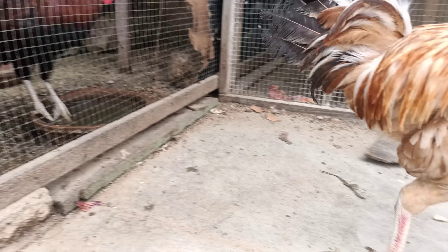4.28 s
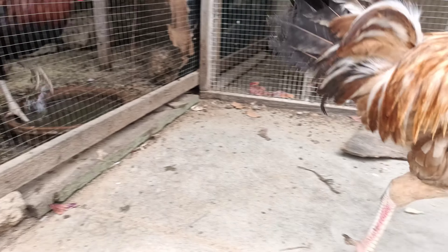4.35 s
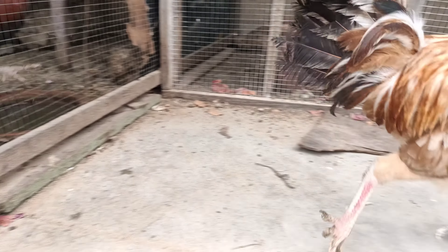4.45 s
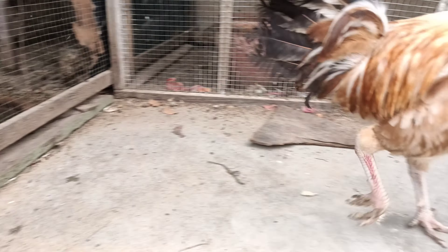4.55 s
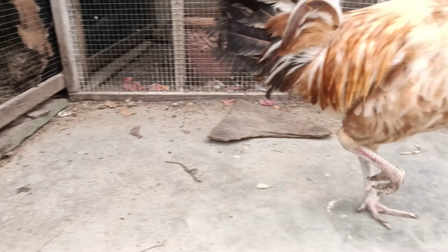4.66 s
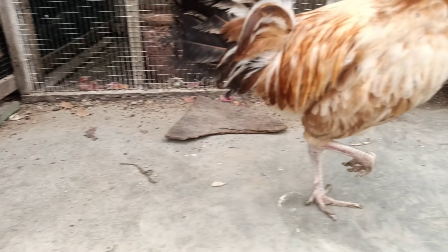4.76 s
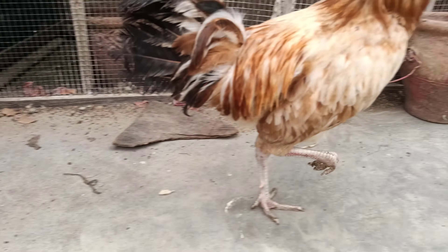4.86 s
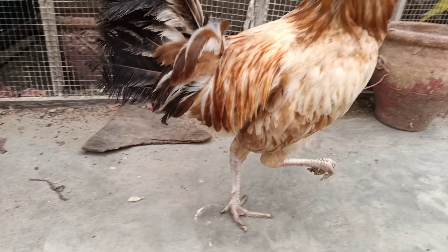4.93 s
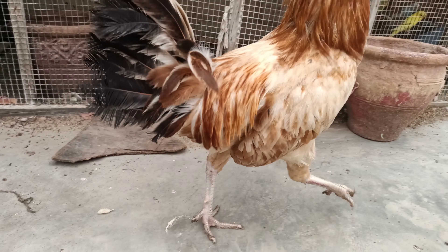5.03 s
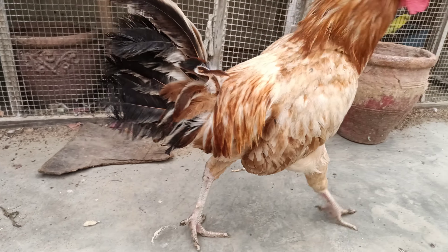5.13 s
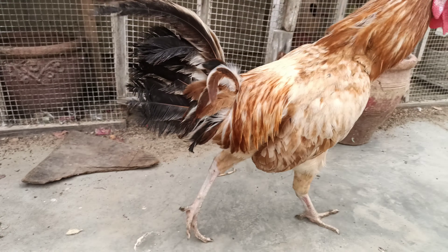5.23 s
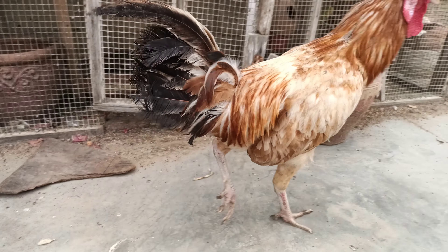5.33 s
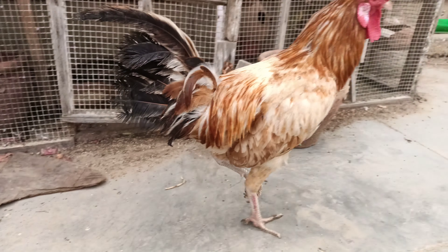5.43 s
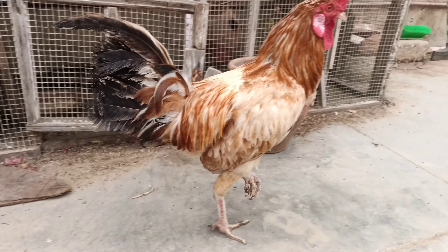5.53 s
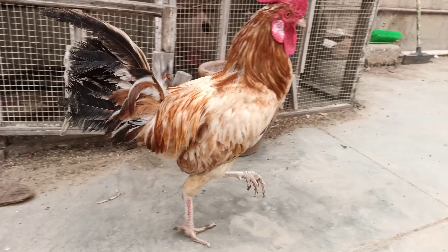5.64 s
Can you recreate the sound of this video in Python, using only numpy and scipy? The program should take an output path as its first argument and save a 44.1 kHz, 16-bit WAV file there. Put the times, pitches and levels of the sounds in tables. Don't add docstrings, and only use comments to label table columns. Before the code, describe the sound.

Hand-held stereo microphone in a concrete yard. A rooster purrs faintly close by amid light beak and claw ticks, then heavy low wind buffets mainly the right side for about two seconds. Small birds in pens to the right squeak in falling whistles with a short wall echo. As the wind weakens, the rooster gives three loud throaty clucks, then a looser run and a soft last one.

```python
import sys
import numpy as np
from scipy import signal
from scipy.fft import rfft, irfft, next_fast_len
from scipy.io import wavfile
from scipy.ndimage import uniform_filter1d, minimum_filter1d

SR = 44100
rng = np.random.default_rng(int(sys.argv[2]) if len(sys.argv) > 2 else 0)


def gain_from_decibels(decibels):
    exponent = np.asarray(decibels, float) / 20
    return 10 ** exponent


def to_wav(s):
    ch = np.atleast_2d(s).T
    pcm = np.round(np.clip(ch, -1, 1) * 32767)
    wavfile.write(sys.argv[1], SR, pcm.astype(np.int16))


N = 250929

# (time [s], level [dB], left minus right [dB])
WIND_LEVEL = [(0.0, -18, -11.5), (0.11, -40, -5), (0.3, -29.5, 7), (0.65, -18.5, -35), (1.54, -19.5, -34),
              (1.68, -36, -4), (1.9, -22, -50), (2.36, -42, 1), (2.69, -27, -50), (2.82, -36, -20),
              (3.55, -29.5, -42), (3.63, -42, -6), (4.17, -34, -35), (4.61, -47.5, 10), (4.71, -37, -15),
              (4.93, -59, -4), (5.12, -32.5, -34), (5.69, -48.5, 0)]
# (time [s], length [s], pitch [Hz], level [dB])
YOUNG_SQUAWKS = [
    (0.116, 0.021, 1130, -50),
    (0.344, 0.016, 1025, -44.5),
    (0.463, 0.029, 1056, -41),
    (0.689, 0.025, 1033, -47),
]


def rooster():
    # (time [s], peak [dB], pitch [Hz], roughness [0-1], lift of the upper throat [dB])
    clucks = [
        (3.584, -11, 333.1, 0.63, 5),
        (3.687, -14.5, 320.4, 0.28, -1),
        (3.865, -12, 313, 0.19, -2),
        (4.42, -34, 263, 0.54, -3),
        (4.509, -37.5, 253, 0.08, -7),
        (4.606, -17.5, 291.4, 0.51, -2),
        (4.733, -21, 272, 0.32, -13),
        (4.881, -16, 283.7, 0.4, 0),
        (5.031, -17, 290.3, 0.55, 10),
        (5.457, -31.5, 253, 0.25, -9),
    ]
    voice = purr()
    for s, db, hz, rough, lift_db in clucks:
        length = 0.0341 + .0004 * db
        beak = 0.84 + 0.43 * rough
        add(voice, s, cluck(db, hz, length, beak, rough, lift_db))
    return voice


def cluck(db, hz, length, beak, rough, lift_db):
    # (frequency [Hz], width [Hz], level [dB])
    throat = [(366, 236, 6.5), (470, 259, 6), (910, 188, 4), (1380, 300, -16), (1720, 400, -15),
              (2600, 480, -12), (4000, 4000, -25)]
    t = np.arange(round((length + 0.28) * SR)) / SR
    bend = 0.0392 * np.sin(np.pi * t / length)
    jitter = 0.26 * rough * wander(len(t), 0.0026)
    turns = np.cumsum(hz * (1 + bend + jitter)) / SR
    pulses = sum(np.cos(2 * np.pi * k * turns) for k in range(1, 20))
    puffs = np.exp(-(turns % 1) / 0.61) * rng.standard_normal(len(t))
    swell = np.sin(np.pi * np.clip(t / length, 0, 1) ** 1.9) ** 0.55
    drive = ((1 - rough) * evened(pulses) + rough * evened(puffs)) * swell
    voice = np.zeros(len(t))
    for k, (f, width, gain_db) in enumerate(throat):
        ring = resonate_twice(drive, f * beak, width * 1.3)
        voice += (-1) ** k * gain_from_decibels(gain_db + lift_db * (k in (3, 4))) * ring
    return gain_from_decibels(db) * voice / abs(voice).max()


def purr():
    # (loudest time [s], rise [s], fall [s], level [dB])
    purrs = [
        (.15, 0.14, 0.18, -35.5),
        (.265, 0.09, 0.073, -30.5),
        (3.63, 0.31, 0.28, -35),
        (3.8, 0.17, 0.21, -29.5),
        (3.94, 0.18, 0.12, -34.5),
        (4.5, 0.18, 0.15, -35),
        (5.22, 0.15, 0.14, -41),
        (5.5, 0.11, 0.013, -37.5),
    ]
    # (frequency [Hz], width [Hz], level [dB])
    chest = [(357, 153, 14), (476, 138, 15), (866, 140, -5)]
    turns = np.cumsum(55 * (1 + 0.32 * wander(N, .02))) / SR
    drive = (np.exp(-(turns % 1) / 0.7) + 0.25) * rng.standard_normal(N)
    body = sum(gain_from_decibels(gain_db) * resonate_twice(drive, f, width) for f, width, gain_db in chest)
    return swells(purrs) * evened(body)


def ticks():
    # (time [s], peak [dB])
    pecks = [(.0775, -32.5), (.1171, -34.5), (.2326, -32), (.3317, -29), (.4263, -32.5), (.5207, -32.5),
             (.573, -33), (.6225, -44), (1.143, -30.5), (2.216, -21), (2.3043, -27.5), (2.4452, -28.5),
             (2.546, -26.5), (2.6284, -24), (2.7253, -25.5), (2.7886, -27.5), (3.705, -30), (3.875, -27),
             (4.425, -33.5), (4.8908, -30.5), (5.23, -41), (5.5697, -32.5)]
    # (time [s], peak [dB])
    claws = [(.1595, -27.5), (1.0625, -29.5), (3.4685, -20.5), (3.9783, -27.5), (4.106, -31), (4.1305, -33),
             (4.139, -31), (4.4687, -32), (4.6033, -30.5), (5.259, -31), (5.243, -33)]
    ground = np.zeros((2, N))
    for rows, hz, pan_db in ((pecks, 6100, -3), (claws, 13300, 3)):
        for s, db in rows:
            add(ground, s, tick(db, hz * (1 + .1 * rng.standard_normal()), pan_db))
    return ground


def tick(db, hz, pan_db):
    t = np.arange(900) / SR
    crack = np.exp(-t / 0.0007)
    chip = 0.55 * np.exp(-abs(t - .003) / 0.00035)
    answer = 0.2 * np.exp(-((t - .009) / 0.0017) ** 2)
    shape = crack + chip + answer + 0.11 * np.exp(-t / 0.0064)
    grit = rng.standard_normal((3, len(t)))
    grit = (grit[0] + 2.5 * grit[1:]) * shape
    wide = signal.lfilter(*signal.butter(2, 3500, "high", fs=SR), grit)
    hit = wide + 4.9 * np.array([resonate(g, min(hz, 15500), 3100) for g in grit])
    pan = np.array([[.5], [-.5]]) * pan_db
    return gain_from_decibels(db + pan) * hit / abs(hit.mean(0)).max()


def scuffs():
    # (loudest time [s], rise [s], fall [s], level [dB])
    steps = [
        (0.85, .5, 0.8, -60),
        (1.1, .5, .2, -60.5),
        (4.714, 0.032, 0.39, -53.5),
        (5.32, 0.31, .3, -52),
    ]
    # (frequency [Hz], level [dB per Hz])
    grit_colour = [(530, -17), (900, -6), (1280, -10.5), (1550, -10.5), (2680, -4), (3100, -7),
                   (7260, -16.5), (11000, -27), (15000, -27), (16400, -46)]
    return swells(steps) * gain_from_decibels(12.5) * hiss(grit_colour, patchy_db=1.8)


def birds():
    # (time [s], length [s], start [Hz], end [Hz], level [dB])
    thin_tones = [
        (0, 0.22, 834, 758, -41),
        (0.12, 0.058, 1314, 1324, -46),
        (3.755, 0.034, 2270, 2200, -48.5),
        (3.755, .075, 1870, 1830, -53),
        (.06, 0.094, 2212, 2126, -47),
        (4.77, 0.086, 1220, 1084, -52.5),
        (4.87, 0.02, 2130, 2080, -52),
        (4.93, .02, 1830, 1800, -51),
        (4.69, .02, 2050, 2000, -52),
        (5.323, 0.025, 614, 560, -40.5),
    ]
    # (frequency [Hz], level [dB])
    bird_colour = [(1550, -1), (2050, 6.5), (3000, 7), (5500, 3.5), (7000, 7), (8700, 15), (10500, 10),
                   (14000, 5.5)]
    flock = np.zeros(N)
    for row in songs():
        add(flock, *note(*row))
    flock = flock + rasp(flock)
    for row in thin_tones:
        add(flock, *note(*row, rough=.5))
    return colour(flock, bird_colour)


def songs():
    # (time [s], length [s], level [dB], pitch [factor])
    chirps = [
        (1.502, 0.12, -34.5, 0.93),
        (2.127, 0.11, -35.5, 0.95),
        (3.102, 0.049, -29, 0.97),
        (2.922, 0.091, -45, 0.81),
    ]
    # (start [share], length [share], start [Hz], end [Hz], level [dB])
    stair = [
        (0, 0.14, 4390, 3976, 0.5),
        (.13, 0.287, 3284, 2867, -1.5),
        (0.419, .5, 2500, 2150, -10),
        (.85, 0.15, 1970, 1570, -33),
    ]
    # (time [s], length [s], start [Hz], level [dB])
    slides = [(0.972, 0.025, 3030, -40), (1.014, 0.035, 2810, -43), (1.31, 0.02, 3300, -37),
              (1.33, 0.015, 4200, -44), (.98, .02, 2700, -43), (1.085, .025, 2900, -43),
              (1.11, .02, 2600, -44), (1.612, 0.022, 3750, -36.5), (1.801, 0.024, 3820, -38),
              (1.845, 0.032, 1780, -51.5), (2.291, 0.059, 3370, -43), (2.528, 0.022, 2700, -44),
              (2.6, .03, 2400, -46), (4.33, .03, 2900, -39), (4.255, .02, 1850, -48),
              (2.575, 0.064, 3465, -43), (2.95, 0.017, 3000, -44), (2.969, 0.031, 3300, -40),
              (3.158, 0.02, 2900, -39), (3.15, 0.015, 3500, -44), (4.178, 0.037, 4250, -32.5),
              (4.212, 0.028, 3350, -37), (4.312, 0.01, 3950, -38), (4.285, .02, 3400, -37),
              (4.302, 0.022, 5600, -45), (4.33, 0.012, 5500, -50), (1.738, .014, 3550, -35),
              (4.352, 0.0197, 4400, -41.5), (3.244, 0.026, 3300, -39.5), (3.115, .02, 3700, -41),
              (2.956, 0.022, 2500, -47), (2.895, .015, 2900, -41), (2.296, 0.029, 2700, -52),
              (2.53, 0.03, 2700, -50), (2.606, 0.027, 2900, -44.5), (4.343, 0.032, 3400, -52),
              (5.628, 0.024, 3750, -45), (3.2, 0.019, 2700, -40), (2.985, .02, 3900, -50)]
    # (time [s], length [s], start [Hz], level [dB])
    dives = [(1.293, .02, 3250, -32), (1.303, .02, 4800, -44), (1.505, .026, 4400, -37),
             (1.722, .024, 4400, -37), (1.752, .016, 2700, -44), (1.785, .03, 4600, -44),
             (3.112, .018, 3300, -38), (3.236, .022, 3750, -33), (4.197, .012, 3100, -37),
             (2.288, .02, 4600, -47), (2.85, .02, 2700, -46), (2.895, .02, 2600, -46)]
    # (time [s], length [s], pitch [Hz], level [dB])
    peeps = [(0.21, 0.0069, 2700, -37.5), (0.234, 0.033, 2070, -49.5), (0.918, 0.0091, 4060, -47.5),
             (0.957, 0.01, 2090, -38), (1.069, 0.05, 2300, -41), (1.09, 0.023, 3090, -39.5),
             (1.232, 0.016, 2046, -47.5), (1.275, 0.037, 3230, -37.5), (1.365, 0.017, 3090, -34),
             (1.531, 0.012, 3090, -39), (1.56, .035, 2307, -40), (1.622, 0.011, 3133, -31.5),
             (1.636, 0.027, 2810, -45), (1.752, 0.011, 3250, -40), (1.765, .025, 2158, -47),
             (1.828, .04, 2745, -43.5), (2.182, 0.027, 2420, -44), (2.31, .025, 2040, -44),
             (2.395, .02, 2110, -51), (4.296, 0.025, 2763, -34), (4.23, 0.037, 2600, -38.5),
             (4.203, 0.019, 5660, -43), (4.357, .025, 3150, -46), (4.349, 0.026, 2250, -43.5),
             (4.283, .014, 1530, -48), (4.365, .02, 1580, -50), (4.36, .03, 2150, -49),
             (2.268, 0.015, 2980, -39), (2.345, 0.024, 2550, -48), (2.485, 0.026, 4200, -42.5),
             (2.553, 0.017, 3250, -34.5), (2.835, 0.02, 3600, -45), (2.845, .048, 3370, -40),
             (2.826, .01, 2950, -46), (3.02, .03, 3550, -53), (3.29, .02, 3650, -46),
             (2.899, 0.02, 2550, -43.5), (2.926, 0.025, 3655, -38), (3.197, 0.034, 4260, -47),
             (3.205, 0.016, 3680, -34), (3.225, .012, 3100, -37), (3.753, 0.016, 3420, -48),
             (3.13, .015, 2500, -38), (3.175, .025, 2450, -41), (4.161, 0.022, 4330, -34),
             (4.27, 0.014, 4100, -38), (4.371, 0.01, 4330, -48), (1.592, .035, 1850, -46),
             (1.645, .02, 1850, -48), (2.51, .025, 3100, -40), (2.255, .02, 1850, -48),
             (2.63, .03, 1330, -50), (4.786, 0.056, 2320, -51.5), (5.667, 0.027, 2730, -42)]
    # (multiple, level [dB])
    squawk_orders = [(2, -1), (3, 6), (4, -1)]
    rows = []
    for s, size, db, pitch in chirps:
        rows += [(s + a * size, b * size, f0 * pitch, f1 * pitch, db + g) for a, b, f0, f1, g in stair]
    for calls, octaves_per_s in ((slides, 18), (dives, 28)):
        rows += [(s, size, hz, hz * 2 ** (-octaves_per_s * size), db) for s, size, hz, db in calls]
    rows += [(s, size, hz, hz * 0.94, db) for s, size, hz, db in peeps]
    for s, size, hz, db in YOUNG_SQUAWKS:
        rows += [(s, size, k * hz, k * hz * .93, db + g) for k, g in squawk_orders]
    return rows


def note(s, length, start_hz, end_hz, db, rough=1):
    t = np.arange(round((length + 0.0066) * SR)) / SR
    shake = 40 * rough * wander(len(t), .002)
    phase = 2 * np.pi * np.cumsum(np.geomspace(start_hz, end_hz, len(t)) + shake) / SR
    tone = np.sin(phase) + gain_from_decibels(-20.5) * np.sin(2 * phase + 1)
    flutter = .8 + .45 * rough * wander(len(t), .002 + .01 * length)
    husk = gain_from_decibels(-14) * wander(len(t), .0007) * np.sin(phase)
    splash = gain_from_decibels(-28) * wander(len(t), 0.00023) * np.sin(2 * phase)
    whistle = tone * flutter + rough * (husk + splash)
    return max(s - .003, 0), gain_from_decibels(db) * whistle * signal.windows.tukey(len(t), .4)


def rasp(whistles):
    # (loudest time [s], rise [s], fall [s], level [dB])
    chatter = [(0.87, 2, 1.9, -56.5), (1.04, 0.24, 0.25, -49.5), (1.34, 0.13, 0.32, -52.5),
               (1.65, 0.26, 0.24, -60), (2.25, 0.37, 0.31, -55), (2.95, 0.21, 0.12, -48.5),
               (3.21, 0.28, 0.37, -51), (4.265, 0.17, 0.28, -48.5), (3.8, 0.6, 0.44, -62.5),
               (0.14, .3, .3, -57), (4.8, .2, .2, -60), (4.93, .1, .1, -60), (1.31, .02, .06, -44),
               (2.6, .1, .1, -55)]
    hz = 2600 * (1 + .09 * wander(N, .008))
    low = evened(resonate_twice(rng.standard_normal(N), hz, 1300))
    high = evened(resonate_twice(rng.standard_normal(N), 7500, 4500))
    flutter = gain_from_decibels(2.5 * wander(N, .004))
    squawk_air = [(s + size / 2, size / 2, 0.034, db + 5.5) for s, size, hz, db in YOUNG_SQUAWKS]
    breath = swells(chatter + squawk_air) * flutter * (low + gain_from_decibels(-41.0) * high)
    return breath + gain_from_decibels(-16.5) * whistles * wander(N, .0004)


def from_pens(flock):
    # (frequency [Hz], level [dB])
    left_tone = [(1000, -0.5), (2800, -3), (4500, 2), (8000, 2.5), (14000, 10.5)]
    direct = np.array([colour(later(flock, count=12), left_tone, 1), flock])
    wall = np.array([later(flock, count=640), -later(flock, count=730)])
    return direct + gain_from_decibels(-10) * wall + gain_from_decibels(-8.5) * yard(flock)


def wind():
    # (loudest time [s], rise [s], fall [s], level [dB])
    gusts = [(.26, 0.21, 0.064, -26.5), (1.44, .2, .1, -21), (2.08, 0.28, 0.26, -24.5),
             (2.47, 0.18, 0.16, -27.5), (3.24, 0.6, 0.084, -30.5), (3.42, 0.098, 0.23, -27),
             (3.53, 0.095, 0.044, -23), (4.04, 0.33, 0.098, -28), (4.35, 0.33, 0.045, -31.5),
             (4.72, 0.095, .08, -30), (5.09, 0.13, .2, -31), (5.4, 0.26, 0.082, -32), (5.69, 0.13, .1, -31)]
    # (time [s], half width [s], depth [dB])
    lulls = [
        (0.452, 0.014, -12),
        (0.578, .015, -11),
        (1.491, 0.034, -7.5),
        (2.79, 0.02, -11.5),
        (3.292, 0.031, -14),
        (4.42, 0.048, -3.5),
        (5.32, 0.05, -10),
    ]
    # (frequency [Hz], level [dB per Hz])
    eddy_colour = [(15, -69), (25, -12.5), (86, 3), (127, -2.5), (167, 3), (270, -7), (422, -13.5),
                   (595, -31), (1080, -50), (1500, -122), (1950, -100), (3300, -120)]
    pan = gain_from_decibels(follow(WIND_LEVEL, column=2))
    right = 2 * gain_from_decibels(follow(WIND_LEVEL)) / np.sqrt(1 + pan ** 2)
    t = np.arange(N) / SR
    calm = gain_from_decibels(sum(db * np.exp(-((t - s) / half) ** 2) for s, half, db in lulls))
    level = np.array([right * pan, calm * np.maximum(right, 2 * swells(gusts))]) * gain_from_decibels(2.0)
    lumps = .6 * np.array([wander(N, .015), wander(N, .015)])
    out = np.zeros((2, N))
    for hz in np.geomspace(30, 730, num=10):
        hits = (rng.random((2, N)) < .5 * hz / SR) * rng.standard_normal((2, N))
        layer = evened(signal.oaconvolve(hits, swirl(hz, turns=1.406)[None], "same"))
        strength = np.minimum(level / 0.074, 2) ** (0.18 * np.log2(hz / 130))
        gust = gain_from_decibels(np.log2(hz / 25) * lumps) * strength
        out += layer * gust * gain_from_decibels(read(eddy_colour, hz)) * np.sqrt(hz)
    out *= level / np.sqrt(uniform_filter1d(out ** 2, 7000))
    strong_eddies(out[1], eddy_colour)
    return out


def strong_eddies(port, eddy_colour):
    # (time [s], peak [dB], sharpness [factor])
    eddies = [(0.032, -28.5, 1.8), (0.262, -28.5, 2.1), (0.342, -37, 2.1), (0.361, -31.5, 2.2),
              (0.4, -19, 1.75), (0.484, -33, 1.6), (0.507, -32, 1.3), (0.527, -37, 1.44),
              (0.553, -26, 1.15), (0.597, -25, 1.67), (0.617, -26, 1.3), (0.645, -18, 1.17),
              (0.664, -14, 1.5), (0.677, -22, 1.2), (0.735, -22.5, 1.43), (0.809, -22.5, 1.7),
              (0.839, -19, 1.2), (0.869, -20, 1.47), (0.92, -13, 1.78), (0.956, -24, 1.3),
              (0.976, -20, 1.86), (1.027, -31, 0.92), (1.06, -24, 1.33), (1.11, -30, 1.3),
              (1.166, -19, 1.5), (1.187, -23.5, 1.2), (1.209, -20.5, 1.58), (1.243, -15, 2.28),
              (1.271, -23, 1.76), (1.297, -18, 1.95), (1.362, -27, 1.3), (1.37, -16, 2), (1.396, -18, 1.66),
              (1.422, -19, 1.55), (1.439, -25, 1.34), (1.525, -19.5, 1.76), (1.545, -12, 1.96),
              (1.579, -27, 1.6), (1.874, -26.5, 1.47), (1.905, -20, 0.99), (1.942, -15.5, 1.53),
              (1.96, -26.5, 1.77), (2.038, -15, 1.66), (2.136, -22.5, 1.6), (2.633, -34, 0.96),
              (2.68, -22, 1.2), (2.734, -25.5, 1.15), (3.021, -30, 1.38), (3.127, -32.5, 1.2),
              (3.162, -48, 1.5), (3.349, -41, 0.87), (3.426, -32, 1), (3.526, -27, 1.5), (4.284, -27, 1.17),
              (5.095, -40.5, 1)]
    snap = colour(signal.unit_impulse(N, SR), eddy_colour, 0.9)[SR - 800:SR + 800] * np.hanning(1600)
    place = np.arange(-800, 800)
    for s, db, sharp in eddies:
        a, b = rng.uniform(-1.12, 1, 2)
        push = np.interp(place * sharp, place, snap)
        burst = push - 0.47 * np.roll(push, round(130 + 50 * b))
        add(port, s - .014, np.sign(a + .7) * gain_from_decibels(db + 18.0) * burst / snap.max())


def swirl(hz, turns):
    t = np.linspace(-1.5, 1.5, round(3 * turns * SR / hz))
    return np.exp(-4 * t ** 2) * np.cos(2 * np.pi * turns * t + .5)


def open_air():
    # (frequency [Hz], level [dB per Hz])
    air_colour = [(410, -3), (700, -16.5), (1190, -23.5), (1760, -21), (2520, -20.5), (5000, -29),
                  (7720, -29), (9920, -33.5), (13800, -28), (15700, -43), (16400, -48)]
    duck_db = 0.23 * uniform_filter1d(follow(WIND_LEVEL) + 35, 9000)
    return gain_from_decibels(-45 - duck_db) * hiss(air_colour, patchy_db=3.4)


def yard(x):
    # (frequency [Hz], decay by 60 dB [s])
    decay = [(300, 0.27), (1500, 0.15), (3000, 0.23), (8000, 0.12), (16000, 0.075)]
    taps = np.zeros((2, SR // 2))
    at = np.arange(150, SR // 2 - 20, 20) + rng.integers(0, 20, (2, (SR // 2 - 151) // 20))
    np.put_along_axis(taps, at, rng.choice([-1., 1.], at.shape), 1)
    hz, t, z = signal.stft(taps, SR, nperseg=256)
    tail = signal.istft(z * gain_from_decibels(-60 * t / read(decay, hz)[:, None]), SR, nperseg=256)[1]
    return signal.fftconvolve(x[None], tail / np.linalg.norm(tail[0]), axes=1)[:, :N]


def hiss(points, patchy_db):
    frames, hz = N // 128 + 5, np.fft.rfftfreq(512, 1 / SR)
    a, b = rng.standard_normal((2, 2, 257, frames))
    patches = uniform_filter1d(rng.standard_normal((257, frames)), 8, 0)
    patches = evened(uniform_filter1d(patches, 14, 1))
    z = (a + 1j * b) * gain_from_decibels(read(points, hz)[:, None] + patchy_db * patches)
    return evened(signal.istft(z, nperseg=512, noverlap=384)[1][:, :N])


def swells(rows):
    t = np.arange(0, N, 32) / SR
    levels = [db - 22 * np.maximum((s - t) / rise, (t - s) / fall) for s, rise, fall, db in rows]
    return np.interp(np.arange(N) / SR, t, gain_from_decibels(np.max(levels, axis=0)))


def resonate(x, hz, width):
    turn = np.exp(2j * np.pi * np.cumsum(hz * np.ones(len(x))) / SR)
    r = np.exp(-np.pi * width / SR)
    return 2 * (turn * signal.lfilter([1 - r], [1, -r], x / turn)).real


def resonate_twice(x, hz, width):
    return resonate(resonate(x, hz, width), hz, width)


def wander(length, seconds):
    span = max(int(seconds * SR), 2)
    return evened(uniform_filter1d(uniform_filter1d(rng.standard_normal(length), span), span))


def colour(x, points, shift=0.97):
    size = next_fast_len(N + 4096)
    gain = gain_from_decibels(read(points, np.fft.rfftfreq(size, 1 / SR) / shift))
    return irfft(rfft(x, size) * gain, size)[..., :N]


def read(points, hz):
    f, value = np.transpose(points)
    return np.interp(np.log(hz + 1), np.log(f + 1), value)


def follow(rows, column=1):
    rows = np.array(rows)
    return np.interp(np.arange(N) / SR, rows[:, 0], rows[:, column])


def evened(x):
    return x / np.sqrt(np.mean(x ** 2) + 1e-20)


def later(x, count):
    return np.pad(x, (count, 0))[:N]


def add(mix, s, sound):
    part = mix[..., round(s * SR):][..., :sound.shape[-1]]
    part += sound[..., :part.shape[-1]]


def scene():
    voice, ground = rooster(), ticks()
    near = np.array([gain_from_decibels(-1.5) * voice, np.roll(voice, 3)]) + ground
    echoes = gain_from_decibels(-12) * yard(voice) + gain_from_decibels(-11) * yard(ground.mean(0))
    return near + echoes + scuffs() + from_pens(birds()) + wind() + open_air()


def low_pass(x):
    return signal.sosfilt(signal.butter(12, 16530, fs=SR, output="sos"), x)


def record(dry):
    peak = -minimum_filter1d(-abs(dry), 300)
    held = dry * uniform_filter1d(np.minimum(.9 / peak, 1), 300)
    held = signal.oaconvolve(held, signal.firwin(255, 16000, fs=SR)[None], "same")
    return low_pass(held)


dry = scene()
out = record(dry)
to_wav(out)
```